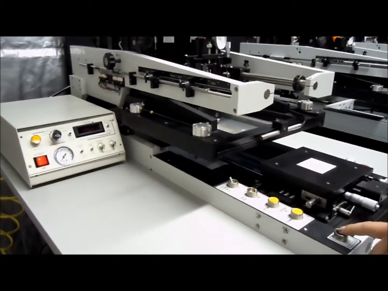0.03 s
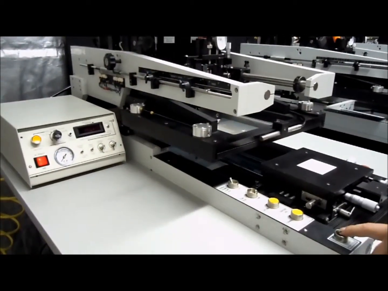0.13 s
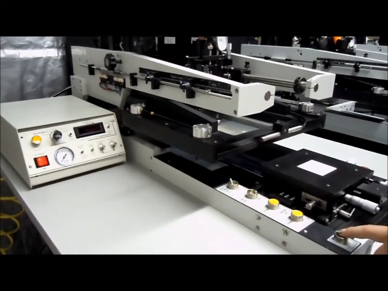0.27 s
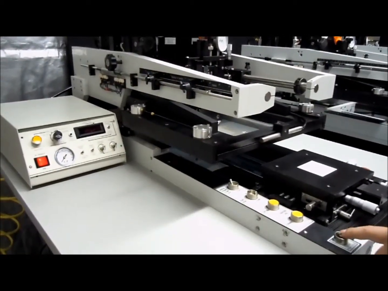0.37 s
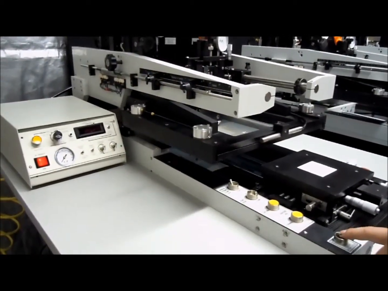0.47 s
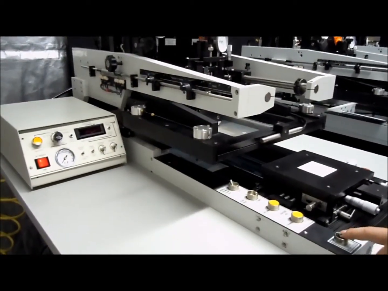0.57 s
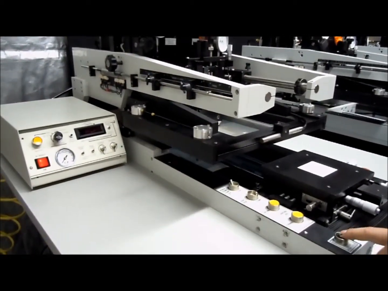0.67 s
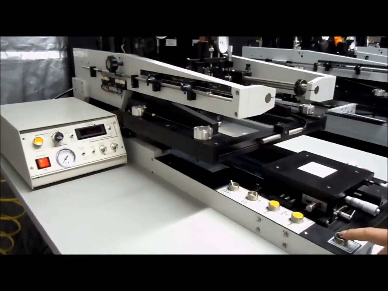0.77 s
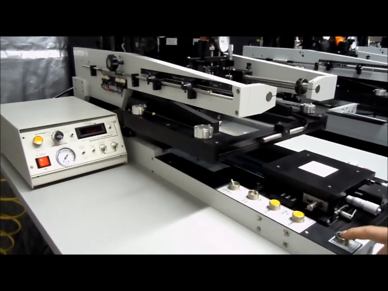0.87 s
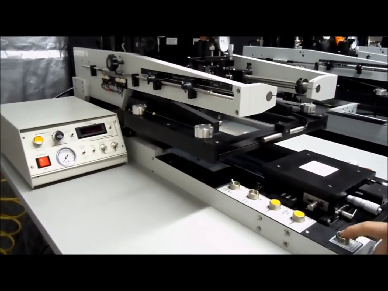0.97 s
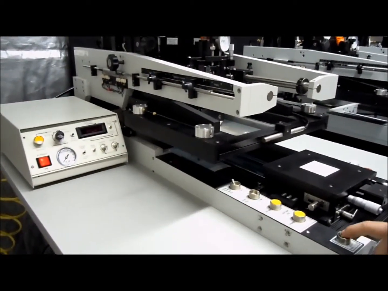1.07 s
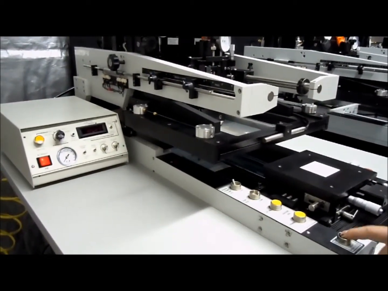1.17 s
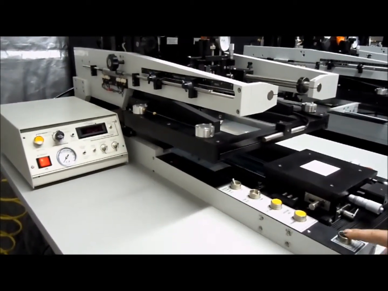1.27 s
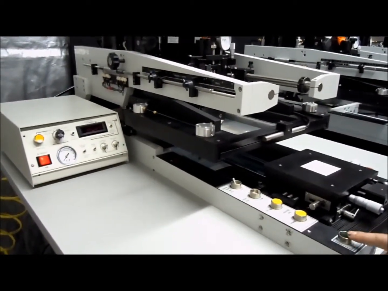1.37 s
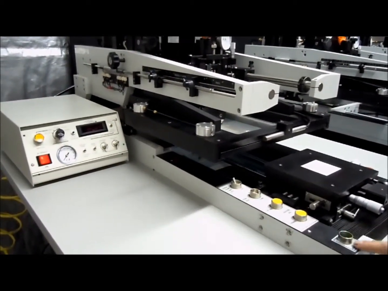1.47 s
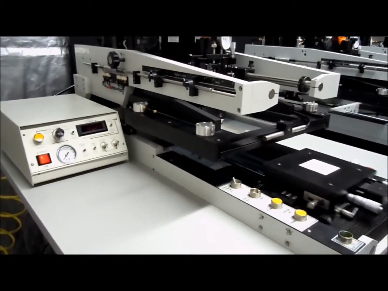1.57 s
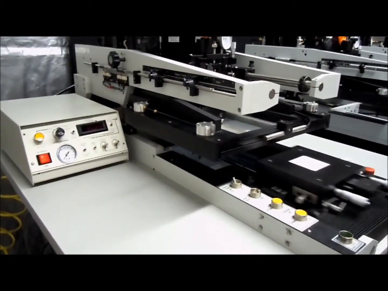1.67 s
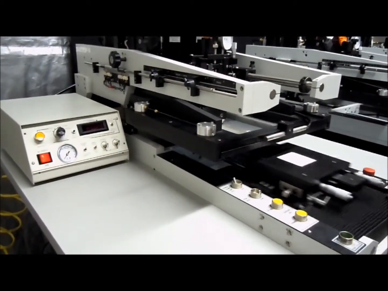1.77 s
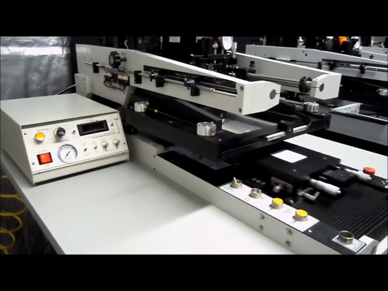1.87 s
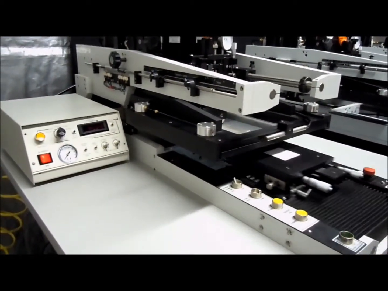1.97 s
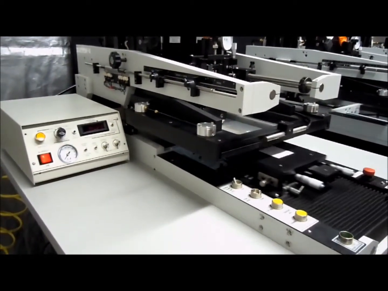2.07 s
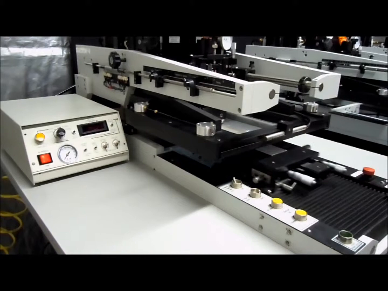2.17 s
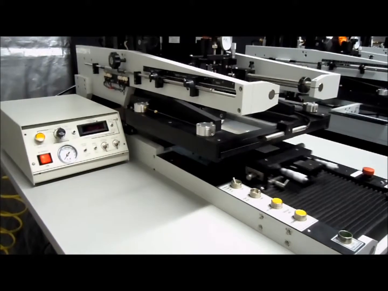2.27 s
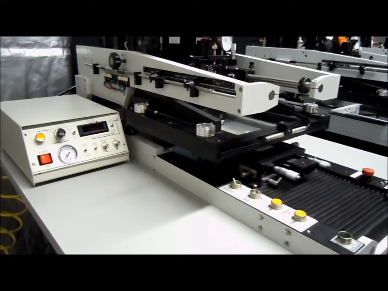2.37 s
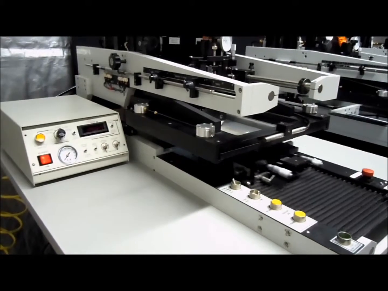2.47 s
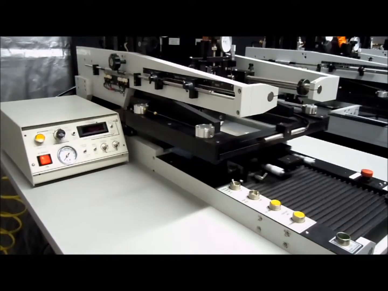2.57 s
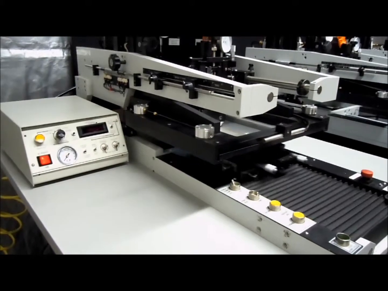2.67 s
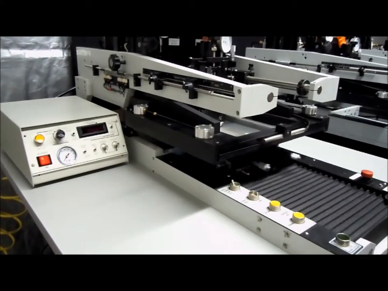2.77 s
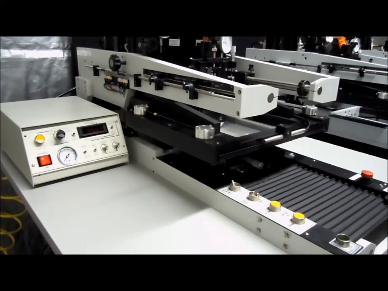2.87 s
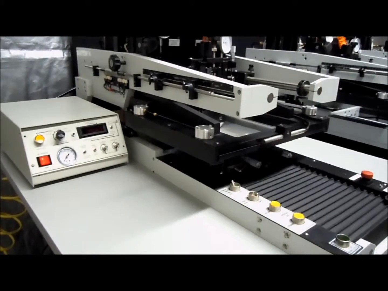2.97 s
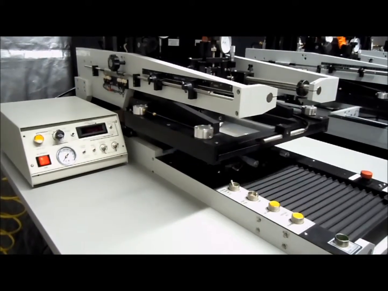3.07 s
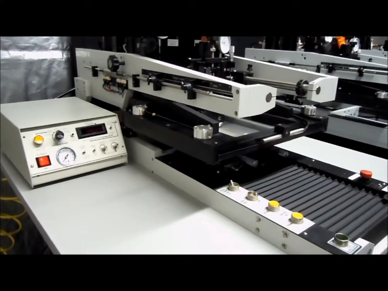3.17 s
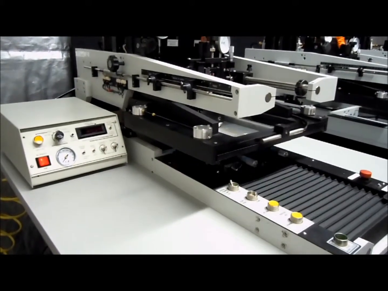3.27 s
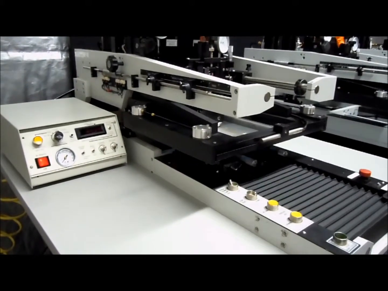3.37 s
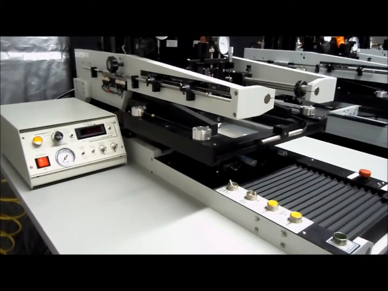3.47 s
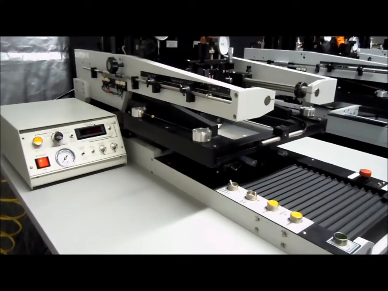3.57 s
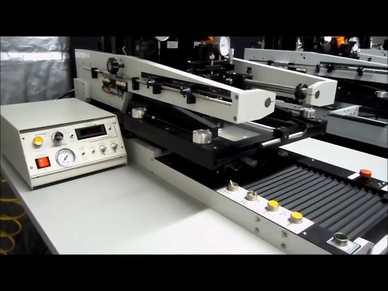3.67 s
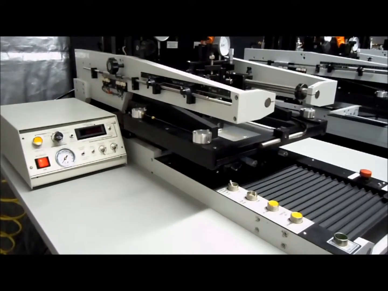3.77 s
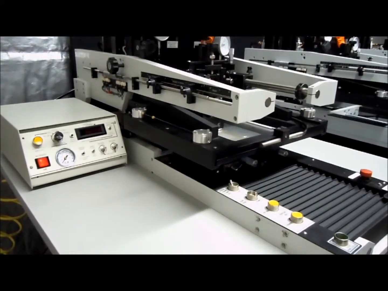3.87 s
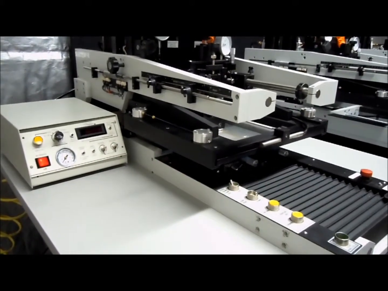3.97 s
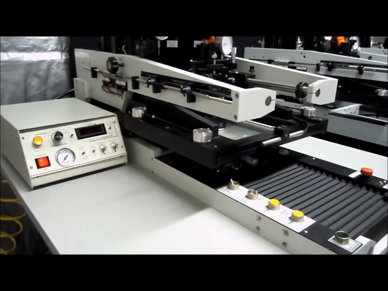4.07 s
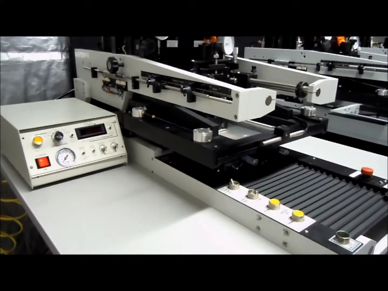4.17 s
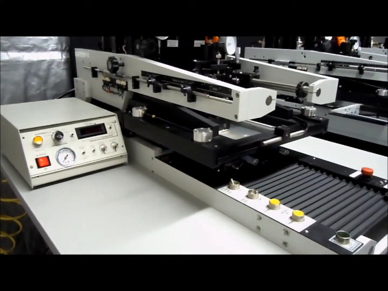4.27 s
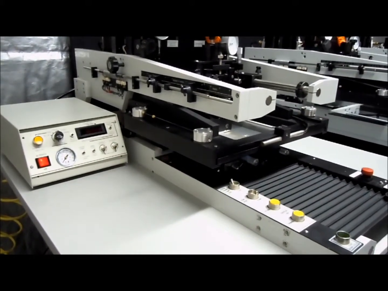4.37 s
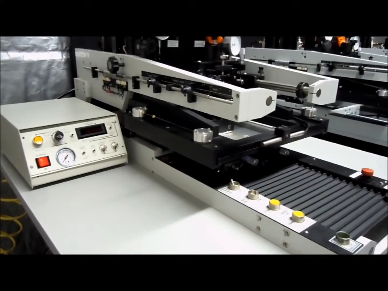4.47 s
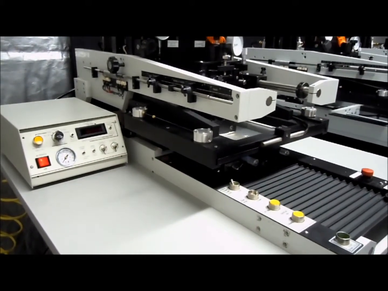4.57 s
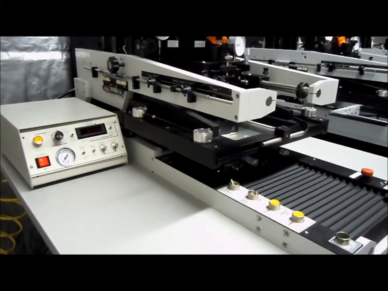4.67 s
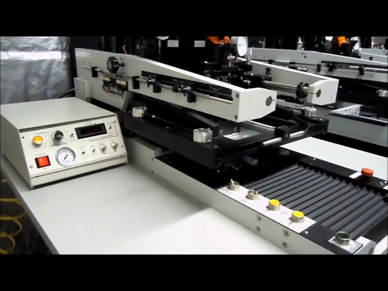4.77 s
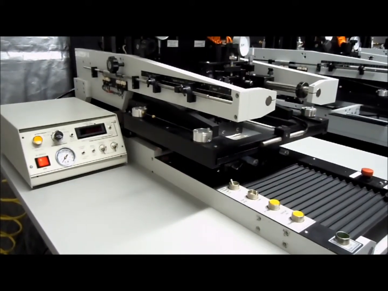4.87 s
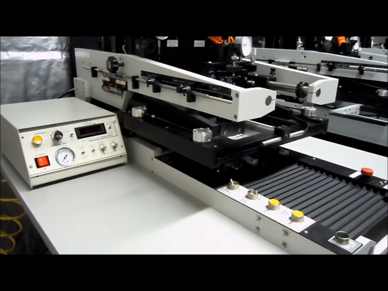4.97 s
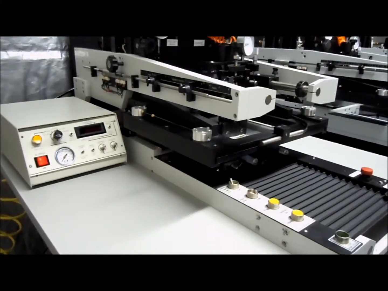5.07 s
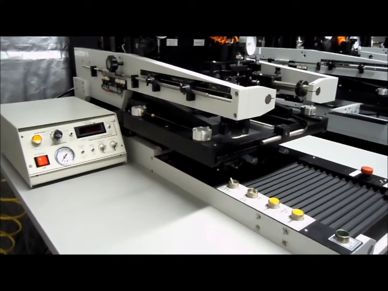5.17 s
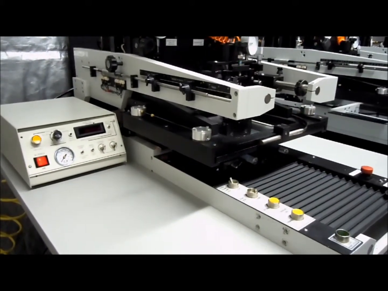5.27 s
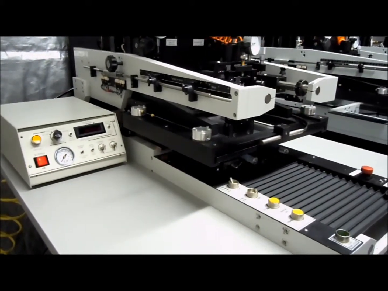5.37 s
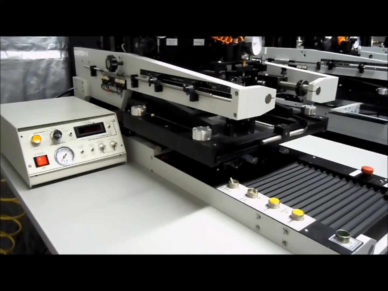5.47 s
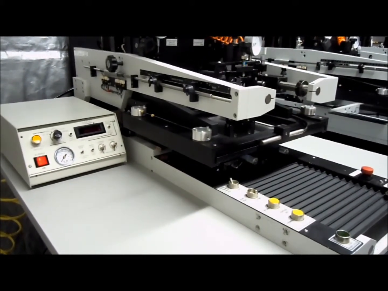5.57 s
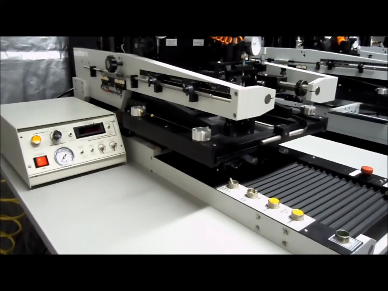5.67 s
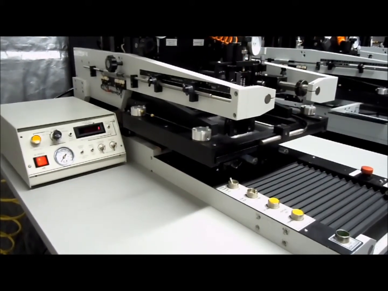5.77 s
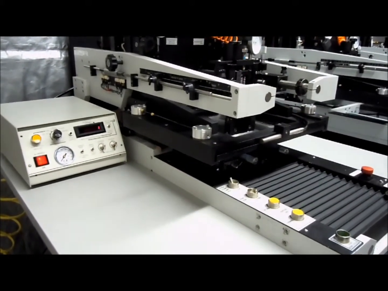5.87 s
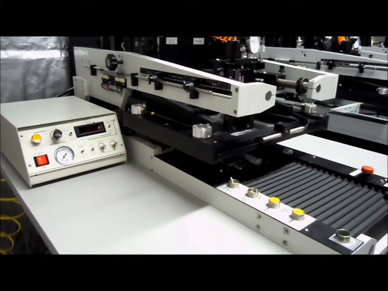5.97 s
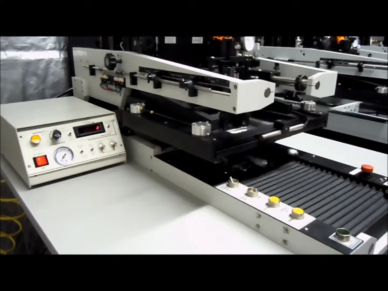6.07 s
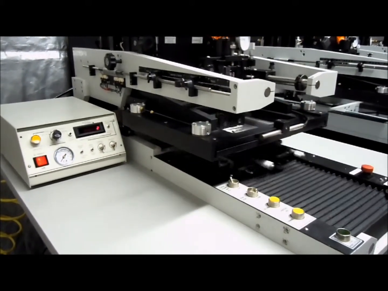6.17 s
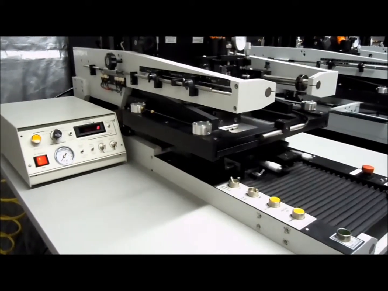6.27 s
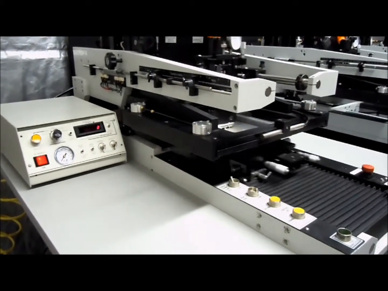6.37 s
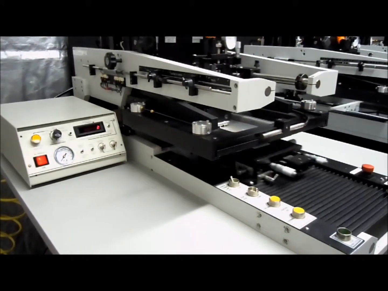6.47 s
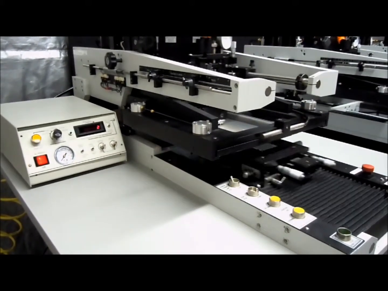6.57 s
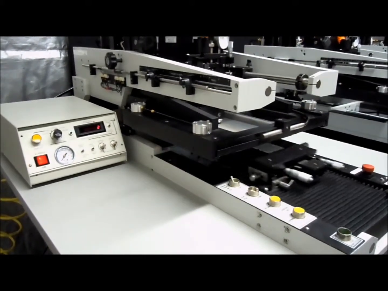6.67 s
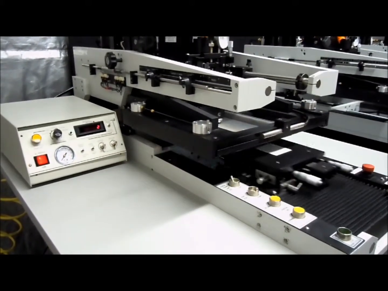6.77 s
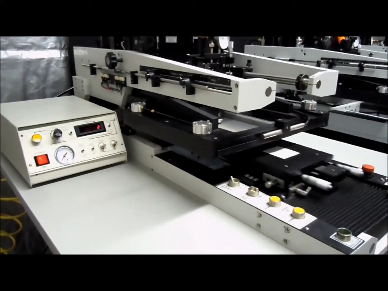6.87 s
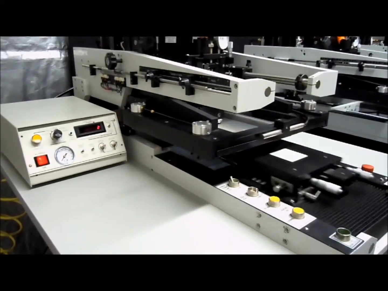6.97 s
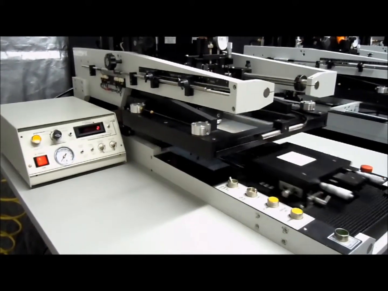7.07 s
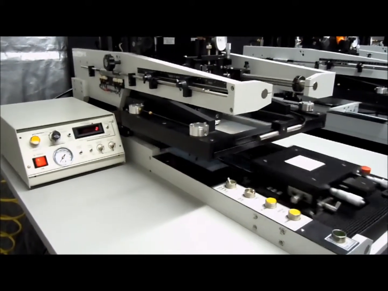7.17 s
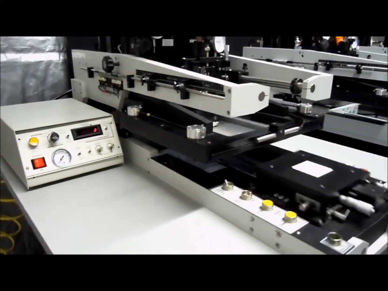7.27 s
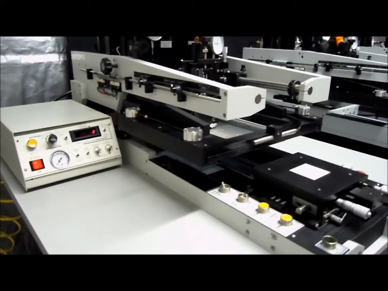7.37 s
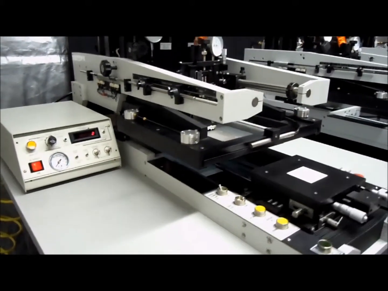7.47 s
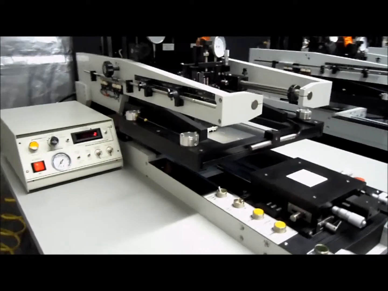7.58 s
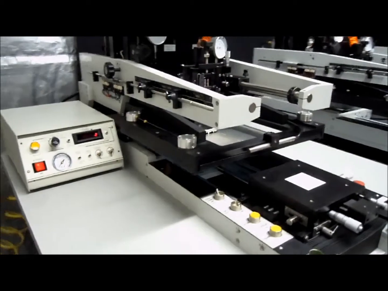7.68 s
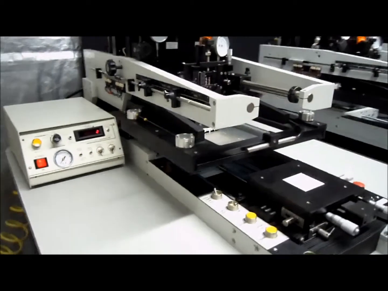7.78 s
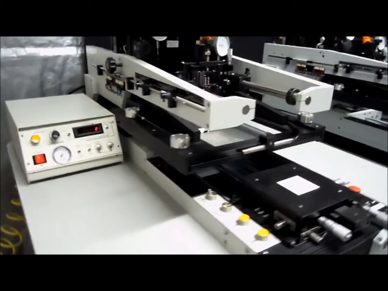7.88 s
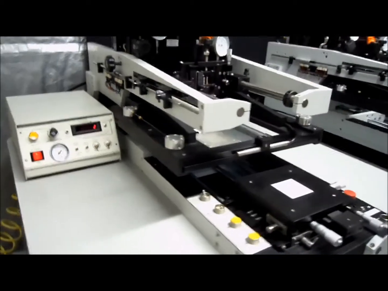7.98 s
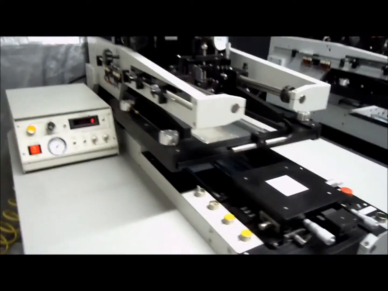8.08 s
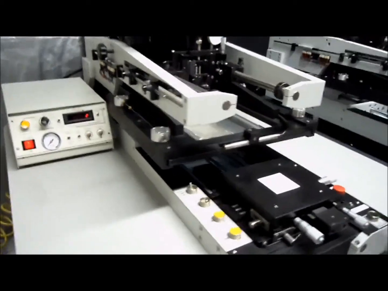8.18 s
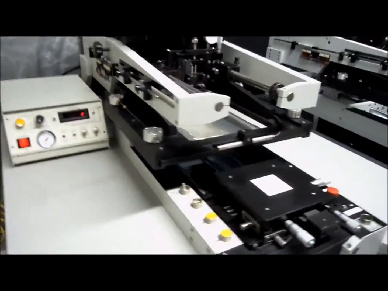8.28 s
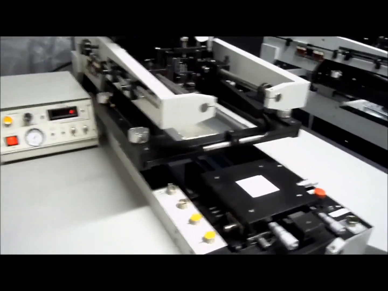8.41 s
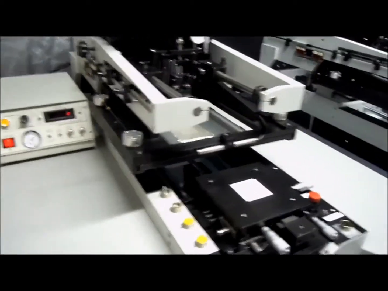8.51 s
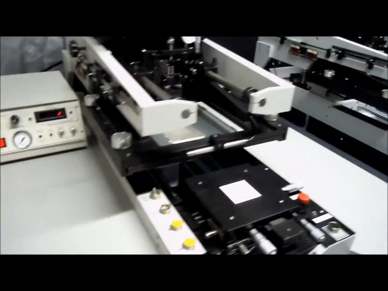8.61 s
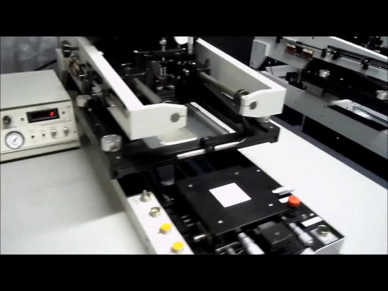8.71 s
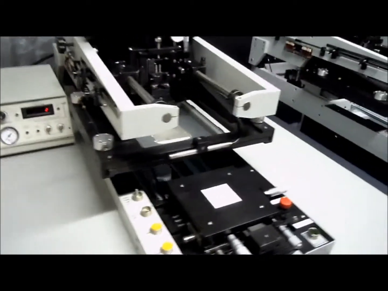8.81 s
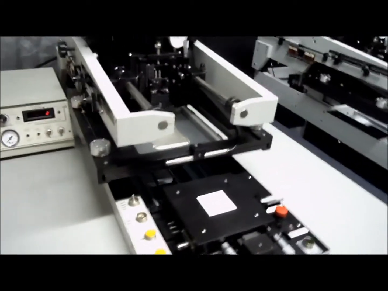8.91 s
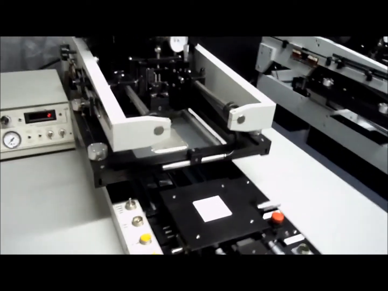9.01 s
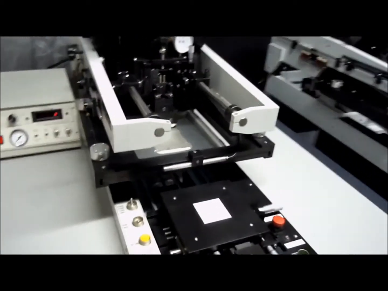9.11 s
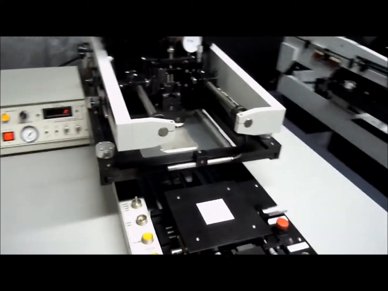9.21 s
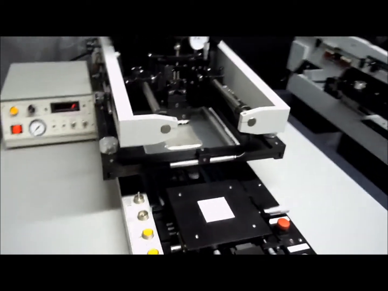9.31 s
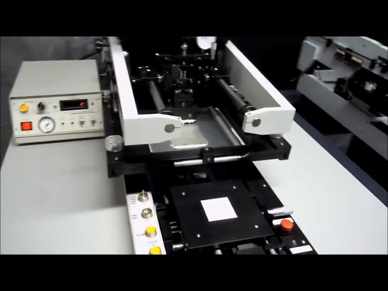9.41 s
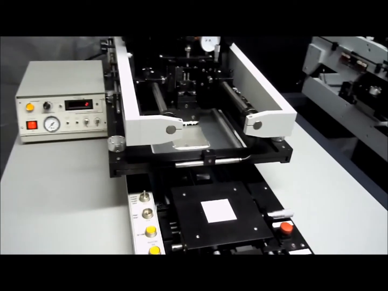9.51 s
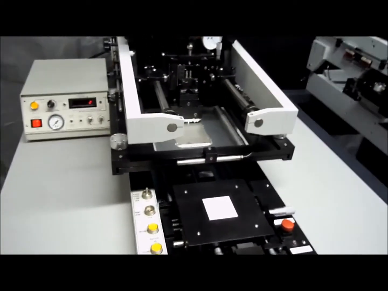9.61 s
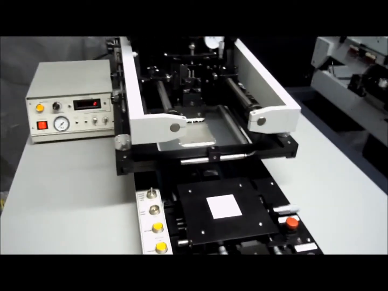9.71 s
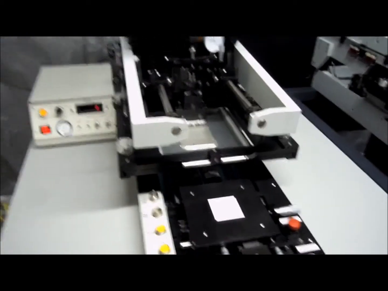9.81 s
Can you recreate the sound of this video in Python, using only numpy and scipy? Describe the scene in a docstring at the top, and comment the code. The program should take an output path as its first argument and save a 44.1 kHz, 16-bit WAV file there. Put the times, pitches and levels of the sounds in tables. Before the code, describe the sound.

Close by, solenoids snap, cylinders slam and air blasts out in four long hisses, with knocks and table rolling, before the machine rests.

```python
"""Pneumatic stencil printer, one cycle

A machine heard from close by in a workshop: solenoid valves click, cylinders slam and vent through four
exhaust ports, the table rolls in and out, and the print head knocks on its frame.
Air is filtered noise, impacts are noise bursts and decaying sines sent through resonant metal.
Under it all lie the room's rumble and a small whistling leak, softer once the machine rests."""
import sys
import numpy as np
from scipy import signal
from scipy.fft import rfft, irfft, next_fast_len
from scipy.io import wavfile
from scipy.ndimage import map_coordinates

SR = 44100
rng = np.random.default_rng(int(sys.argv[2]) if len(sys.argv) > 2 else 0)


def materialize(psi):
    """Save the field psi as 16-bit PCM at rate SR to the path in sys.argv[1].

    A 1-D psi becomes a single channel; in a 2-D psi each row is a channel.
    """
    bounded = np.clip(np.atleast_2d(psi).T, -1, 1)
    quanta = np.round(bounded * 32767).astype(np.int16)
    wavfile.write(sys.argv[1], SR, quanta)


N = 434385
TIME = np.arange(N) / SR
SIZE = next_fast_len(N + SR, real=True)  # transform length, with a second to spare for tails
HZ = np.fft.rfftfreq(SIZE, 1 / SR)
TOP_HZ = 14250  # upper limit of the whole sound

# Room rumble and the wash of air. Each row: frequency in Hz, relative level in dB.
RUMBLE = [(12, -33), (20, 1.5), (51, -1), (86, -5.5), (226, -10.5), (255, -12.5), (369, -13), (497, -20),
          (577, -28.5), (700, -22.5), (910, -52), (1540, -120)]
AIR = [(290, -25), (500, -2), (1330, -7), (1800, -8.5), (2560, -8.5), (4160, -14.5), (4990, -11.5),
       (6240, -16), (8130, -12), (8480, -11.5), (14000, -21)]
# Whistle of the leaking fitting. Each row: frequency in Hz, width in Hz, relative level in dB.
LEAK = [(2640, 290, 24.5), (4970, 390, 27), (7840, 88, 39.5)]
# Spread of the room's background. Each row: frequency in Hz, gain of the sides in dB.
ROOM_WIDTH = [(100, -17), (500, -9), (1500, -6.5), (4000, -7), (9000, 1), (14000, -3)]
RUMBLE_DB, AIR_DB, LEAK_DB = -47.5, -52.5, -64
LEAK_SIDE_DB = 3.5  # the whistle reaches the two ears out of step
SEEP_DB, SEEP_LOW_HZ = -54, 5500  # air seeps past the seals while the cylinders are under pressure
CYCLE_END_S, RUMBLE_DROP_DB, AIR_DROP_DB = 7.44, 2.5, 4.5  # the background eases once the machine rests
SHUDDER_DB, SHUDDER_T60_S = -44.5, 2.8  # the bench shakes after the last stop

# Broad colour of the steel parts. Each row: frequency in Hz, relative level in dB.
STEEL = [(70, -9.5), (250, -13), (550, -12.5), (850, -9), (1250, -11.5), (2000, -5.5), (3200, -14),
         (6000, -3.5), (9500, -8), (14000, -18)]
# Resonances of the steel parts. Each row: frequency in Hz, width in Hz, lift in dB.
STEEL_MODES = [(1047, 62, 6.5), (2960, 60, 8.5), (2990, 200, 3), (3530, 100, 9), (3860, 63, 6),
               (4250, 280, 8), (8900, 717, 8), (9856, 28, 18), (10386, 38, 0), (13570, 422, 4.5)]
# Hard metal contacts. Each row: start in seconds, level in dB, t60 in seconds, brightness in dB.
CONTACTS = [(.176, -57, 0.014, 21.5), (1.375, -33.5, 0.019, 20.5), (1.501, -34, .035, 13),
            (1.7, -35, 0.022, 15.5), (1.877, -32, .027, 15.5), (1.942, -35, .025, 6.5),
            (1.975, -32, 0.017, 10.5), (2.11, -25, 0.029, 8.5), (5.407, -42, 0.083, 0.5),
            (5.583, -20.5, 0.034, 1), (5.744, -20.5, 0.16, 6.5), (5.864, -27.5, .024, 9.5),
            (5.974, -27, .07, 7.5), (6.045, -31, 0.099, 0), (6.724, -36, .1, -3), (7.425, -21.5, 0.052, 3),
            (8.535, -47.5, 0.046, 2.5), (9.764, -45, 0.14, 1.5), (9.8, -37.5, 0.075, 0.5)]
# A jolt starts each stroke, led by the thud of the valve's spool.
# Each row: jolt start in seconds, jolt level in dB, spool level in dB.
JOLTS = [(1.051, -8.5, -21), (3.245, -28, -29), (5.544, -13, -25.5), (6.782, -17.5, -27.5)]
JOLT_T60_S, SPOOL_T60_S, SPOOL_LEAD_S = 0.085, 0.072, .008

# Solenoid clicks. Each row: start in seconds, level in dB ahead of the clicks' common trim, lower ring in Hz,
# upper ring in Hz, extra lift of the lower ring in dB.
CLICKS = [(0.9971, -12.5, 4020, 9210, 2), (1.0214, -12.5, 3680, 7740, 6), (3.1936, -26.5, 4630, 8010, -17),
          (3.214, -18.5, 4230, 7700, -10), (3.2367, -13.5, 3580, 7700, 20), (5.2194, -7, 4130, 9300, 9.5),
          (5.4884, -25.5, 3150, 6820, -24), (5.5144, -38.5, 3780, 8910, -10)]
# Broad colour of the solenoids. Each row: frequency in Hz, relative level in dB.
SOLENOID = [(100, -13), (1000, -11.5), (2500, -7.5), (5000, -4.5), (9000, 5), (11000, -2), (14000, -10.5)]

# The four strokes: table in, head down, head up, table out. Each exhaust hiss joins a falling dump of
# pressure to a steadier push of air, whose rise may begin before the valve opens.
# Each row: valve opens in seconds, surge level in dB, dump level in dB, dump fall in dB per second,
# push starts to rise in seconds, push level in dB, fade starts in seconds, fade length in seconds.
STROKES = [(1.047, -32, -23.5, 20, 1.51, -33, 3.0, 0.14), (3.245, -32, -19, 24.5, 3.31, -24.4, 3.938, 0.33),
           (5.544, -11, -19, 19, 5.3, -38, 6.85, .1), (6.781, -14, -17.5, 16, 6.9, -30.5, 7.152, .39)]
OPEN_S, PUSH_RISE_S = 0.0037, 0.37  # a valve opens; the push of air rises
SURGE_FALL_DB_PER_S, FADE_CURVE = 131.5, 1.68
# Broad colour of each exhaust jet. Each row: frequency in Hz, relative level in dB.
TABLE_IN_JET = [(1300, -29), (2500, -21), (4000, -16.5), (6000, -13), (8500, -7), (11000, -13.5),
                (14000, -16.5)]
HEAD_DOWN_JET = [(1000, -25), (1400, -21), (1750, -18.5), (4200, -14), (5000, -7), (8000, -9),
                 (11500, -18.5), (14000, -10.5)]
HEAD_UP_JET = [(500, -20.5), (1200, -22.5), (3000, -14.5), (6500, -14), (8500, -9), (11000, -16),
               (14000, -16.5)]
TABLE_OUT_JET = [(500, -29), (1400, -23.5), (2500, -15.5), (4000, -17), (6500, -14), (8200, -3.5),
                 (11000, -12), (14000, -21)]
# Resonances of each port and its silencer. Each row: frequency in Hz, width in Hz, lift in dB.
TABLE_IN_PORT = [(1328, 97, 5), (2170, 225, 1), (4300, 47, -3.5), (6100, 68, 4.5), (6518, 59, 6.5),
                 (9370, 390, 8.5), (13820, 142, 8.5)]
HEAD_DOWN_PORT = [(1650, 165, 7.8), (1890, 56, 4.2), (3000, 60, 4.1), (5010, 310, 8.1), (5600, 100, 8),
                  (5880, 104, 2.8), (6613, 79, 4.5), (7000, 270, 10), (8830, 510, 8.3), (9550, 138, 8.3),
                  (10086, 173, 11), (10660, 314, 8.6), (11020, 215, 8.2), (11480, 730, 14.9),
                  (12040, 175, 6.8)]
HEAD_UP_PORT = [(980, 113, 5.4), (1891, 201, 3.5), (3730, 226, 3.3), (4040, 83, 6), (4312, 40, 4.5),
                (5340, 140, 6.9), (5800, 120, 4.5), (6520, 160, 5.1), (7340, 321, 4.3), (8050, 210, 8.9),
                (9030, 870, 6.7), (10180, 150, 7.2), (10530, 787, 7.6), (11900, 541, 5.7), (13800, 242, 10)]
TABLE_OUT_PORT = [(945, 136, 9.9), (1820, 140, 3.5), (3450, 190, 7.4), (3725, 157, 9.1), (4060, 210, 14),
                  (5050, 120, 7.5), (5200, 410, 6.8), (5680, 206, 9), (7150, 55, 5.8), (7810, 62, 6.4),
                  (8360, 139, 7), (11780, 105, 6.8), (12030, 146, 10.5), (12100, 153, 6.5),
                  (13765, 863, 10)]

# Parts that ring on when struck. Each row: mode in Hz, level in dB, t60 in seconds.
TABLE_CYLINDER = [(210, -21, 0.24), (470, -10.5, 0.18), (540, -6.5, 0.1), (598, -5.5, 0.16),
                  (626, -3.5, 0.18), (831, -4.5, 0.18), (970, -18, .22), (1720, -10, 0.13), (1974, -3, 0.1),
                  (2050, -6, .15), (2240, -0.5, 0.088), (2500, -24, 0.16), (2780, 2, 0.07)]
CATCH = [(890, 3, 0.033), (1050, 1, 0.036), (1160, 4.5, 0.032), (1305, -2, 0.046)]
LIFT_ARM = [(956, -6.5, 0.13), (1030, -13, 0.11), (1142, -8.5, 0.1), (1380, -9.5, .13), (1430, -3, 0.13),
            (1703, -2, 0.076), (1780, 4, .07), (1920, 2.5, 0.093), (1974, -5, 0.06), (2026, -4, .11),
            (2110, 1.5, 0.069), (2210, -9, 0.108)]
END_STOP = [(157, -11, 0.39), (230, -1, 0.4), (289, -6, 0.32), (380.5, -10.5, 0.41), (607.1, -9.5, 0.19),
            (688, -4, 0.13), (1240, -5, 0.089), (2200, 0.5, 0.085), (3060, 9, 0.034), (3300, 6, 0.026),
            (3340, 4, 0.035), (5400, -14, .05)]
# Blows on those parts. Each row: start in seconds, level in dB.
TABLE_CYLINDER_HITS = [(1.052, -17), (1.062, -25.5)]
CATCH_HITS = [(2.11, -22)]
LIFT_ARM_HITS = [(5.549, -16.5), (5.565, -17), (5.583, -21)]
END_STOP_HITS = [(7.425, -26.5)]

# Broad colour of the spitting air. Each row: frequency in Hz, relative level in dB.
SPIT_JET = [(120, -50), (200, -17.5), (504, -8), (707, -11), (956, -20.5), (1200, -6), (1750, -12.5),
            (1880, -11), (4410, -5.5), (8360, 3.5), (14000, -13)]
SPIT_START_S, SPIT_HOLD_S, SPIT_DB, SPIT_FALL_DB_PER_S = 1.697, 0.15, -21.5, 124

# The table's runs, in then out. Each row: start in seconds, stop in seconds, rolling level in dB.
RUNS = [(1.72, 3.12, -49), (6.28, 7.427, -55)]
# The bearings bite as the table speeds up or brakes.
# Each row: centre in seconds, half length in seconds, level in dB.
BITES = [(1.87, .085, -35.5), (2.94, .14, -45), (6.63, .13, -51.5)]
# Resonances of the rails. Each row: frequency in Hz, width in Hz, lift in dB.
RAILS = [(560, 170, 9), (840, 90, 2.5), (1090, 34, 9)]
RAIL_OUT_HZ, RAIL_IN_HZ, RUN_RAMP_S = 1220, 600, .1  # rolling pitch at either end; time to get rolling

# Cushioned knocks of head and table. Each row: start in seconds, level in dB, t60 in seconds, brightness in dB.
KNOCKS = [(3.113, -42.5, 0.17, 7), (3.237, -25, 0.1, -10), (3.66, -29, 0.17, -1), (3.671, -23.5, 0.058, 4),
          (3.81, -26.5, .089, -10.5), (3.827, -29, 0.24, -8.5), (3.932, -30, .1, 0), (3.99, -35.5, .17, 1),
          (4.133, -31.5, 0.31, -1.5), (4.396, -37, 0.32, -5.5), (5.22, -36.5, 0.17, -10),
          (5.407, -36.5, .14, 0), (5.606, -47.5, .12, -30.5), (5.87, -38.5, 0.28, -19.5),
          (6.045, -37.5, 0.33, 1), (6.244, -51, .15, -22.5), (6.35, -35.5, 0.23, -1),
          (6.724, -30, 0.25, -2.5), (6.776, -26, 0.22, -7.5), (7.138, -35, 0.091, -12.5),
          (7.253, -38, 0.16, 13), (7.427, -34.5, 0.31, -10)]
# Puffs of air as a valve opens. Each row: start in seconds, level in dB, t60 in seconds.
PUFFS = [(3.245, -7, 0.069), (3.972, -14, 0.061), (4.476, -30, 0.089), (4.498, -23.5, .039),
         (6.782, -12, 0.16)]
# Broad colour of the frame and the valve block. Each row: frequency in Hz, relative level in dB.
FRAME = [(60, -3), (200, -10.5), (400, -16.5), (750, -16), (1200, -28.5), (3000, -22)]
BLOCK = [(60, -22.5), (115, 1), (170, -24), (240, -12.5), (400, -20.5), (800, -15), (1500, -24),
         (4000, -20), (6500, -15), (8500, -9), (14000, -14)]
# Their resonances. Each row: frequency in Hz, width in Hz, lift in dB.
FRAME_MODES = [(115.8, 11, 6.7), (236, 35, 6.3), (345, 92, 10.6), (556, 110, 9.7), (693, 83, 5.8),
               (941, 90, 3.2), (1140, 300, 9.2), (1315, 71, 7.9), (1750, 210, 4.4), (2050, 65, 4.4),
               (2240, 131, 4), (2930, 280, 7.2)]
BLOCK_MODES = [(970, 84, 9.3), (1765, 197, 7.7), (2980, 220, 10), (3360, 316, 5.5), (4260, 390, 9),
               (5040, 102, 6.7), (5375, 430, 4.5), (8040, 780, 9.4), (12040, 160, 7.4)]

BLEED_START_S, BLEED_RISE_S, BLEED_FADES_S, BLEED_DB, BLEED_FALL_DB_PER_S = 4.07, 0.2, 4.55, -49, 19
BLEED_HZ, BLEED_SAG_OCTAVES_PER_S = 3490, .14

# Soft rustles close to the listener. Each row: centre in seconds, half length in seconds, level in dB.
RUSTLES = [(8.27, 0.12, -56), (8.58, 0.053, -53), (8.97, 0.11, -53.5), (9.05, 0.054, -47),
           (9.85, 0.057, -46)]
# Broad colour of the rustles. Each row: frequency in Hz, relative level in dB.
RUSTLE_COLOUR = [(300, -15), (1500, 5.5), (3500, -0.5), (8000, 6), (11000, -9), (14000, -20.5)]

# Decay of the workshop's echo. Each row: frequency in Hz, t60 in seconds.
ROOM = [(100, 0.55), (1000, 0.36), (4000, 0.29), (14000, 0.24)]
# Stereo spread of the machine. Each row: frequency in Hz, gain of the sides in dB.
WIDTH = [(100, -32), (2500, -28), (3600, -36.5), (4600, -14), (6300, -9), (8500, -4.5), (14000, -4.5)]
# Stereo lean in level. Each row: frequency in Hz, left minus right in dB.
LEAN = [(100, 0.8), (5000, -0.5), (7600, -1), (8500, -1.5), (9500, 5), (12000, 4), (14000, 3.5)]
# Stereo lean in phase. Each row: frequency in Hz, lead of the left in radians.
LEAD = [(100, 0.007), (6500, 0), (7800, 0.57), (8700, 0.72), (10300, 0.42), (14000, .5)]


def amp(db):
    """Decibels to gain."""
    return 10 ** (np.asarray(db) / 20)


def unit(x):
    """Scale to rms 1."""
    return x / np.sqrt(np.mean(np.abs(x) ** 2) + 1e-20)


def along(points, hz=HZ):
    """Join (Hz, value) points on a log frequency axis."""
    f, v = np.transpose(points)
    return np.interp(np.log(hz + 1), np.log(f + 1), v)


def ramp(start, length):
    """Rise from 0 to 1 over length seconds."""
    return np.clip((TIME - start) / length, 0, 1)


def since(start):
    """Seconds gone by after start, 0 before it."""
    return np.maximum(TIME - start, 0)


def swells(rows):
    """Gain of smooth bell-shaped swells."""
    return sum(amp(db) * np.exp(-((TIME - s) / half) ** 2) for s, half, db in rows)


def wobble(rate):
    """A random curve: straight lines between random knots, rate knots a second."""
    knots = rng.standard_normal(int(N * rate / SR) + 4)
    return map_coordinates(knots, [TIME * rate], order=1)


def white():
    """Two unrelated noises: one for the middle, one for the sides."""
    return rng.standard_normal((2, N))


def resonance(hz, width):
    """Bell-shaped peak of height 1 around hz."""
    return 1 / (1 + (2 * (HZ - hz) / width) ** 2)


def colour(points, modes=()):
    """Gain of a broad spectrum with resonances standing on it."""
    lift_db = sum(db * resonance(hz, width) for hz, width, db in modes)
    return amp(along(points) + lift_db)


def band(low_hz, high_hz, order=4):
    """Gain of a band-pass with smooth skirts."""
    low_skirt = 1 + (low_hz / (HZ + 1)) ** (2 * order)
    high_skirt = 1 + (HZ / high_hz) ** (2 * order)
    return (low_skirt * high_skirt) ** -.5


def ring(x, gain):
    """Send x through a causal (minimum-phase) body with this gain; white noise keeps its level."""
    cepstrum = irfft(np.log(np.maximum(unit(gain), 1e-5)), SIZE)
    # fold the cepstrum forward in time, so that the body only answers after it is driven
    cepstrum[1:SIZE // 2] *= 2
    cepstrum[SIZE // 2 + 1:] = 0
    body = np.exp(rfft(cepstrum))
    return irfft(rfft(x, SIZE) * body, SIZE)[..., :N]


def glide(x, centre_hz, octaves, order):
    """Keep a moving band of x, scaled to rms 1."""
    hz, t, z = signal.stft(x, SR, nperseg=1024)
    away = np.log2((hz[:, None] + 1) / np.interp(t, TIME, centre_hz))
    kept = z / (1 + np.abs(away / octaves) ** order)
    return unit(signal.istft(kept, SR, nperseg=1024)[1][:, :N])


def add(track, s, sound):
    """Mix a short sound into a track at time s."""
    part = track[:, round(s * SR):][:, :sound.shape[1]]
    part += sound[:, :part.shape[1]]


def burst(rise, t60):
    """A rush of tiny impulses that swells quickly and dies away."""
    t = np.arange(SR // 2) / SR
    envelope = np.minimum(t / rise, 1) * amp(-60 * np.maximum(t - rise, 0) / t60)
    return envelope * rng.standard_normal((2, len(t)))


def blows(hits, body, edges_hz, tone_db, rise_share):
    """Each blow drives a body's low, middle and high resonances; brightness tips it towards the high."""
    out = np.zeros((2, N))
    for k, band_db in enumerate(tone_db):
        force = np.zeros((2, N))
        for s, db, t60, bright_db in hits:
            strength = amp(db + band_db + (k - 1) * bright_db)
            add(force, s, strength * burst(rise_share * t60, t60))
        out += ring(force, body * band(edges_hz[k], edges_hz[k + 1]))
    return out


def workshop():
    """Rumble, a wash of air, seeping seals and the whistle of a leaking fitting arrive from all sides."""
    resting = ramp(CYCLE_END_S, RUN_RAMP_S)
    shudder = resting * amp(SHUDDER_DB - 60 * since(CYCLE_END_S) / SHUDDER_T60_S)
    low = np.hypot(amp(RUMBLE_DB - RUMBLE_DROP_DB * resting), shudder)
    rumble = ring(white() * low * amp(1.73 * wobble(6.7)), colour(RUMBLE))
    easing = amp(-AIR_DROP_DB * resting)
    air = ring(white() * amp(AIR_DB) * easing, colour(AIR))
    whistle = sum(amp(db) * resonance(hz, width) for hz, width, db in LEAK)
    leak = ring(white() * amp(LEAK_DB) * easing, whistle)
    working = ramp(STROKES[0][0], RUN_RAMP_S) - resting
    seep = ring(white() * amp(SEEP_DB) * working, band(SEEP_LOW_HZ, TOP_HZ, order=2))
    mid, side = rumble + air + seep
    side = irfft(rfft(side, SIZE) * amp(along(ROOM_WIDTH)), SIZE)[:N]
    mid = mid + leak[0]
    side = side + amp(LEAK_SIDE_DB) * leak[1]
    return np.array([mid + side, mid - side])


def steelwork():
    """Light contacts, spool thuds and the jolt that follows each thud all ring the same steel."""
    steel, edges_hz = colour(STEEL, STEEL_MODES), [170, 700, 3000, 14000]
    spools = [(s - SPOOL_LEAD_S, spool_db, SPOOL_T60_S, 0) for s, jolt_db, spool_db in JOLTS]
    jolts = [(s, jolt_db, JOLT_T60_S, 0) for s, jolt_db, spool_db in JOLTS]
    return (blows(CONTACTS, steel, edges_hz, tone_db=[-3, 0, .5], rise_share=.018)
            + blows(spools, steel, edges_hz, tone_db=[3, -1, 4], rise_share=0.019)
            + blows(jolts, steel, edges_hz, tone_db=[-14, 0, -.5], rise_share=0.076))


def solenoids(t60=0.034, tail_t60=.13, tail_db=-23, lower_db=11, upper_db=9,
              lower_width=850, upper_width=800, trim_db=-2):
    """An armature snaps home: a dry crack with two short rings and a faint metallic tail."""
    out = np.zeros((2, N))
    for s, db, lower_hz, upper_hz, share_db in CLICKS:
        crack = burst(0.00022, t60)
        tail = amp(tail_db) * burst(.002, tail_t60)
        force = np.zeros((2, N))
        add(force, s, amp(db + trim_db) * (crack + tail))
        rings = [(lower_hz, lower_width, lower_db + share_db), (upper_hz, upper_width, upper_db)]
        out += ring(force, colour(SOLENOID, rings))
    return out


def flow(opens, surge_db, dump_db, fall_db_per_s, push_starts, push_db, fade_starts, fade_s):
    """Air through an open valve: a brief surge, a falling dump and a steadier push, then a fade."""
    surge = amp(surge_db - SURGE_FALL_DB_PER_S * since(opens))
    dump = amp(dump_db - fall_db_per_s * since(opens))
    push = amp(push_db) * ramp(push_starts, PUSH_RISE_S)
    fade = amp(-20 * (since(fade_starts) / fade_s) ** FADE_CURVE)
    return ramp(opens, OPEN_S) * np.sqrt(surge ** 2 + dump ** 2 + push ** 2) * fade


def exhaust(stroke, jet, port, low_hz, flutter_db=0.45):
    """A turbulent jet sounds through the resonances of its port."""
    turbulence = white() * flow(*stroke) * amp(flutter_db * wobble(90))
    return ring(turbulence, colour(jet, port) * band(low_hz, TOP_HZ))


def exhausts():
    """The four strokes of the cycle, each vented by its own port."""
    table_in, head_down, head_up, table_out = STROKES
    return (exhaust(table_in, TABLE_IN_JET, TABLE_IN_PORT, low_hz=1500)
            + exhaust(head_down, HEAD_DOWN_JET, HEAD_DOWN_PORT, low_hz=1365)
            + exhaust(head_up, HEAD_UP_JET, HEAD_UP_PORT, low_hz=450)
            + exhaust(table_out, TABLE_OUT_JET, TABLE_OUT_PORT, low_hz=450))


def struck(hits, modes, crack_t60=0.0094):
    """A short crack sets a part ringing in its own modes, a little differently each time."""
    out, t = np.zeros((2, N)), np.arange(SR // 2) / SR
    hz, level_db, t60 = np.transpose(modes)[..., None]
    build_up = 1 - amp(-60 * t / crack_t60)
    for s, db in hits:
        phase = rng.uniform(0, 2 * np.pi, (2, len(modes), 1))
        variation_db = rng.normal(0, 1.2, hz.shape)
        strength = amp(db + level_db + variation_db - 60 * t / t60)
        tones = strength * np.sin(2 * np.pi * hz * t + phase)
        add(out, s, tones.sum(1) * build_up)
    return out


def ringing_parts():
    """The table's cylinder, its catch, the lift arm and the end stop ring as decaying sines."""
    return (struck(TABLE_CYLINDER_HITS, TABLE_CYLINDER) + struck(CATCH_HITS, CATCH)
            + struck(LIFT_ARM_HITS, LIFT_ARM) + struck(END_STOP_HITS, END_STOP))


def spit(sputter_db=2.5):
    """Air sputters in crackling spurts as the table starts to move."""
    fall_db = SPIT_FALL_DB_PER_S * since(SPIT_START_S + SPIT_HOLD_S)
    gain = ramp(SPIT_START_S, OPEN_S) * amp(SPIT_DB - fall_db)
    spurts = unit(amp(sputter_db * wobble(700)))
    return ring(white() * spurts * gain, colour(SPIT_JET))


def carriage(spread=0.87):
    """Bearings roll along the ringing rails; their noise is lower the further in the table is."""
    inward, outward = [(1 - np.cos(np.pi * ramp(start, stop - start))) / 2 for start, stop, db in RUNS]
    pitch_hz = RAIL_OUT_HZ * (RAIL_IN_HZ / RAIL_OUT_HZ) ** (inward - outward)
    rolling = sum(amp(db) * (ramp(start, RUN_RAMP_S) - ramp(stop, RUN_RAMP_S)) for start, stop, db in RUNS)
    rails = ring(white(), colour([(100, 0.5), (3000, -1.5)], RAILS))
    return glide(rails, pitch_hz, spread, order=4) * np.hypot(rolling, swells(BITES))


def frame_knocks():
    """Cushioned blows of the head and table shake the frame's resonances."""
    return blows(KNOCKS, colour(FRAME, FRAME_MODES), edges_hz=[80, 220, 900, 2400],
                 tone_db=[-11, 0, -10], rise_share=.028)


def valve_puffs():
    """Air bursts out as a valve opens and rings through the valve block."""
    hits = [(s, db, t60, 0) for s, db, t60 in PUFFS]
    return blows(hits, colour(BLOCK, BLOCK_MODES), edges_hz=[90, 700, 3000, 14000],
                 tone_db=[-19, -17, 0], rise_share=0.047)


def bleed(spread=0.27):
    """A throttle bleeds off the last air in a narrow hiss that sinks with the pressure."""
    gain = ramp(BLEED_START_S, BLEED_RISE_S) * amp(BLEED_DB - BLEED_FALL_DB_PER_S * since(BLEED_FADES_S))
    pitch_hz = BLEED_HZ * 2 ** (-BLEED_SAG_OCTAVES_PER_S * since(BLEED_START_S))
    return gain * glide(white(), pitch_hz, spread, order=8)


def rustle(grain_db=2.0):
    """Rustling close to the listener: noise made grainy by a fast random gain."""
    grain = unit(amp(grain_db * wobble(300)))
    return ring(white() * grain * swells(RUSTLES), colour(RUSTLE_COLOUR))


def room(x):
    """The workshop's answer; each frequency dies at its own speed."""
    hz, t, z = signal.stft(rng.standard_normal((2, SR)), SR, nperseg=256)
    decay = amp(-60 * t / along(ROOM, hz)[:, None])
    tail = signal.istft(z * decay, SR, nperseg=256)[1]
    tail[:, :SR // 200] = 0  # the first echo comes back after 5 ms
    return signal.fftconvolve(x, tail / np.linalg.norm(tail[0]), axes=1)[:, :N]


def scatter(x, length):
    """A dense cluster of reflections from nearby metal, length seconds long."""
    count = int(length * SR) + 2
    echoes = rng.standard_normal(count) * np.linspace(1, 0, count)
    echoes[:SR // 4000] = 0  # the nearest metal answers after 0.25 ms
    return signal.fftconvolve(x, echoes[None] / np.linalg.norm(echoes), axes=1)[:, :N]


def ports(x, scattered_db=-4.5, diffuse_db=-3):
    """Two close microphone ports: alike in the bass, in the treble each has its own reflections."""
    apart = amp(scattered_db) * scatter(x, length=0.0031)[0] + amp(diffuse_db) * x[1]
    share = np.clip((HZ - 3500) / 2000, 0, 1)  # long waves reach both ports by the same paths
    mid = rfft(x[0], SIZE)
    side = share * rfft(apart, SIZE) + (1 - share) * rfft(x[1], SIZE)
    side = side * amp(along(WIDTH))
    # half of the lean goes to the left, its inverse to the right
    lean = amp(along(LEAN) / 2) * np.exp(.5j * along(LEAD))
    return irfft([(mid + side) * lean, (mid - side) / lean], SIZE)[:, :N]


def scene():
    """The whole machine in its room."""
    slams = steelwork() + ringing_parts()
    clicks = solenoids()
    knocks = frame_knocks()
    puffs = valve_puffs()
    echo = room(amp(-9.5) * slams + amp(-11.5) * puffs + amp(-8) * knocks + amp(-14.5) * clicks)
    air = exhausts() + spit()
    air = amp(-1) * air + amp(-8.5) * scatter(air, length=0.031)  # the machine's panels comb the hiss
    impacts = slams + clicks + knocks + puffs
    machine = impacts + echo + air + carriage() + bleed() + rustle()
    return ports(machine) + workshop()


def record(dry):
    """Round off the loudest peaks and keep nothing at or above the band limit."""
    rounded = dry / (1 + np.abs(dry) ** 6) ** (1 / 6)
    return irfft(rfft(rounded, SIZE) * (HZ < TOP_HZ), SIZE)[:, :N]


dry = scene()
out = record(dry)
materialize(out)
```